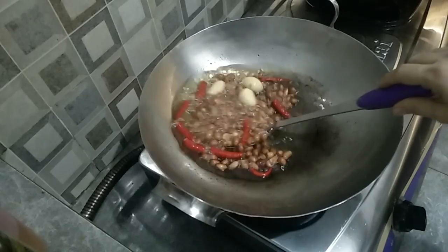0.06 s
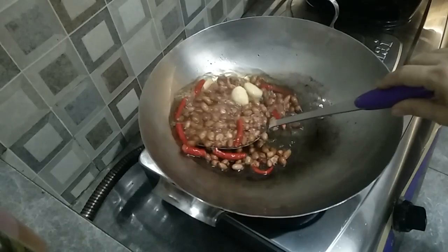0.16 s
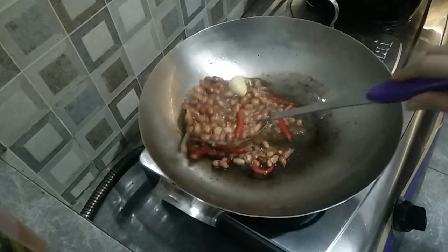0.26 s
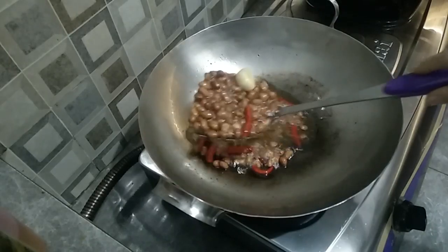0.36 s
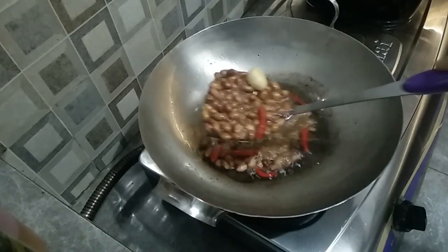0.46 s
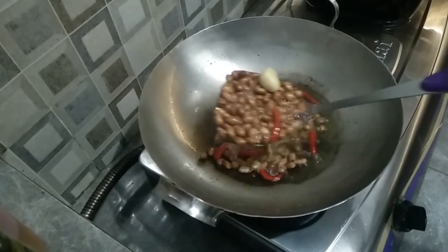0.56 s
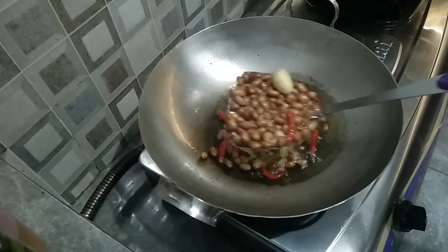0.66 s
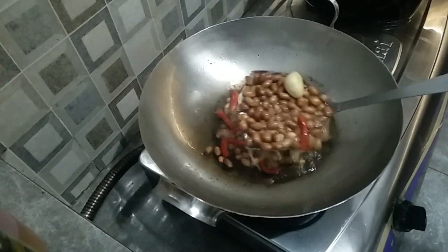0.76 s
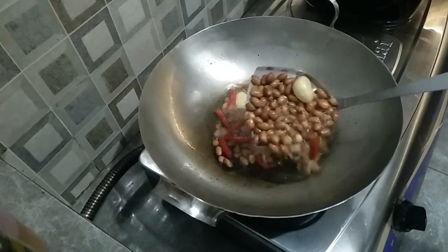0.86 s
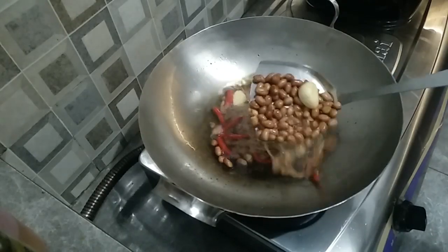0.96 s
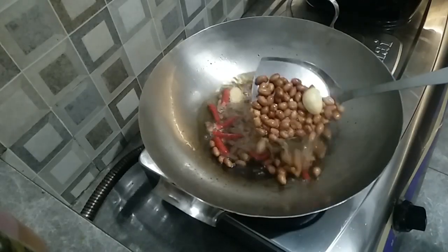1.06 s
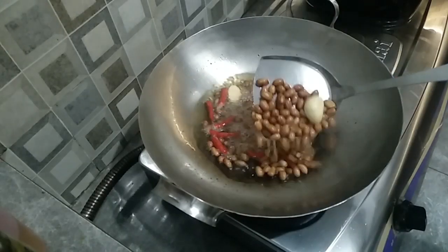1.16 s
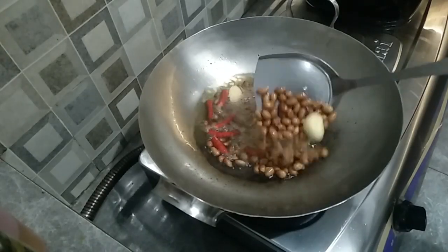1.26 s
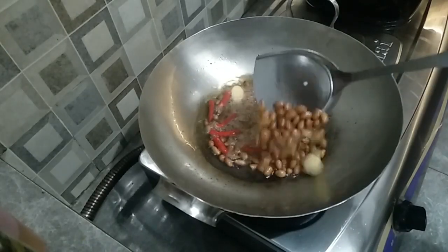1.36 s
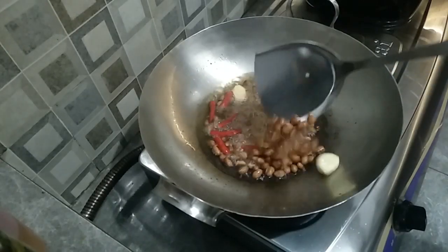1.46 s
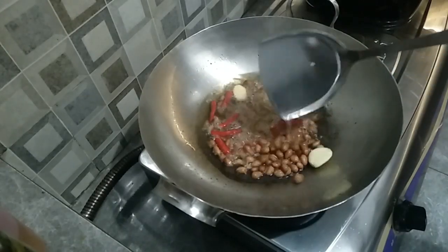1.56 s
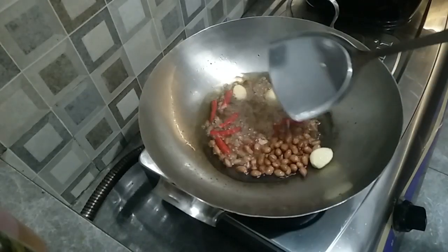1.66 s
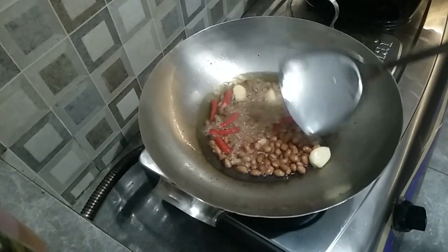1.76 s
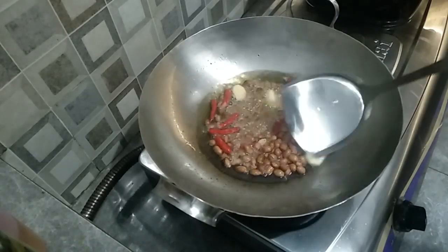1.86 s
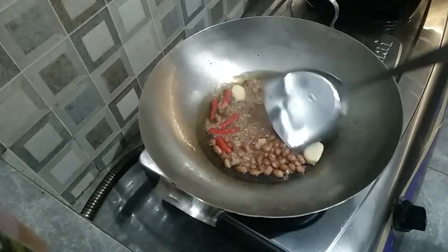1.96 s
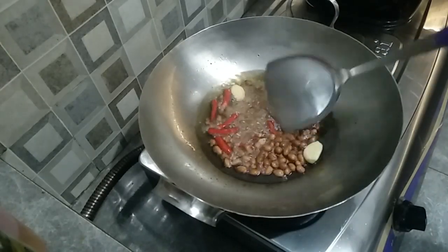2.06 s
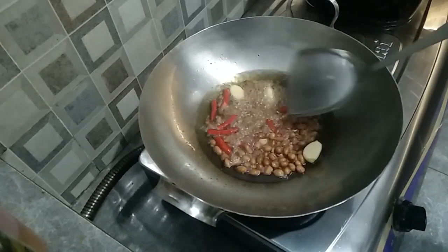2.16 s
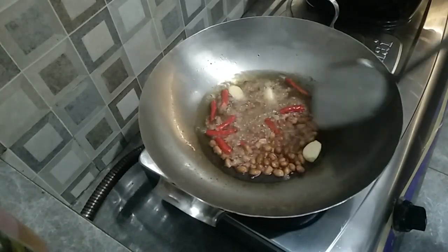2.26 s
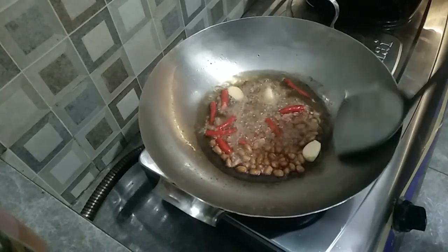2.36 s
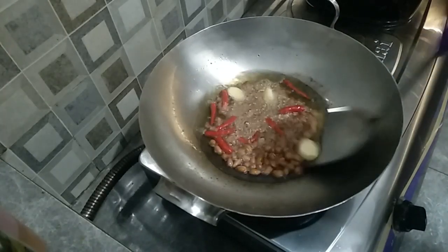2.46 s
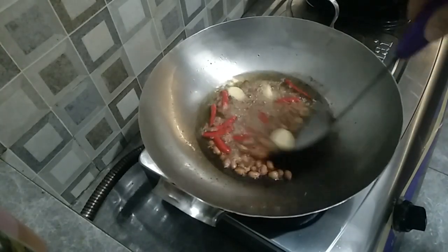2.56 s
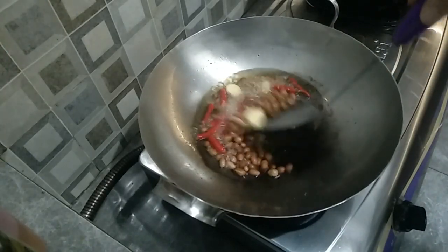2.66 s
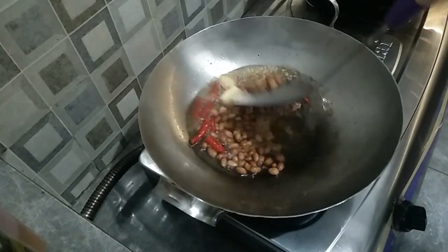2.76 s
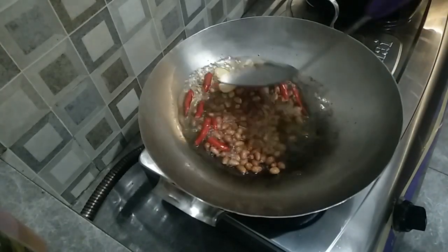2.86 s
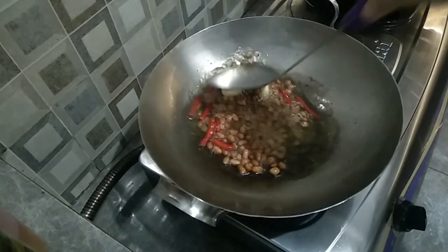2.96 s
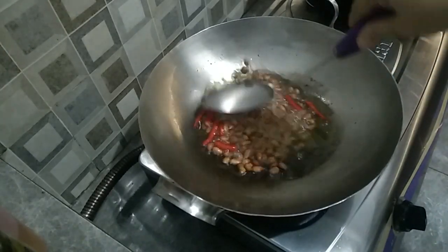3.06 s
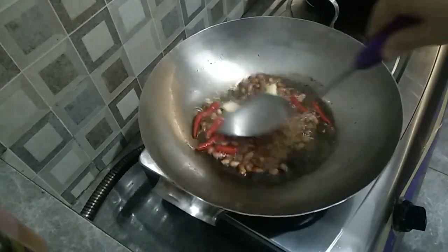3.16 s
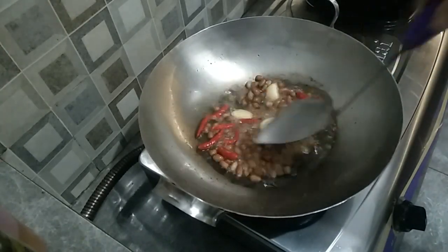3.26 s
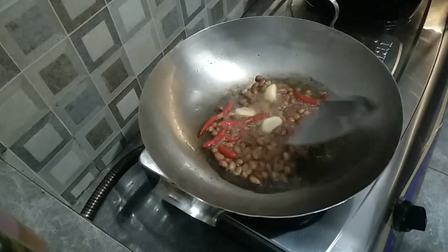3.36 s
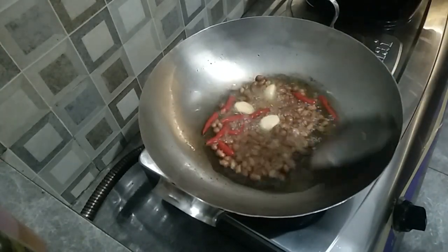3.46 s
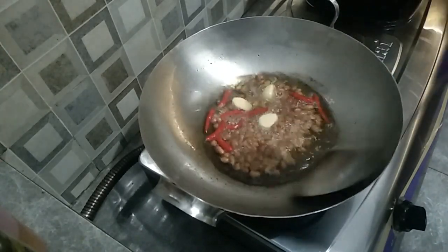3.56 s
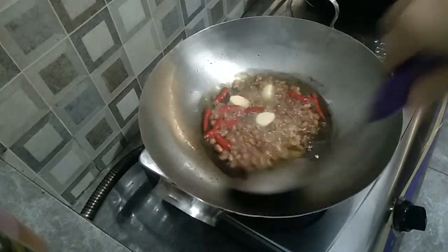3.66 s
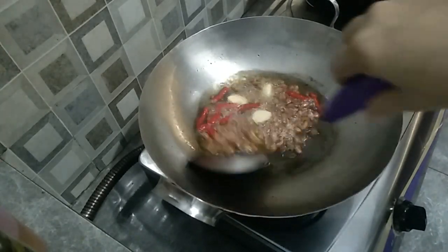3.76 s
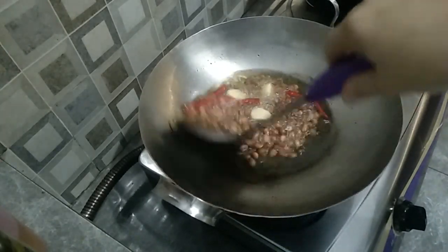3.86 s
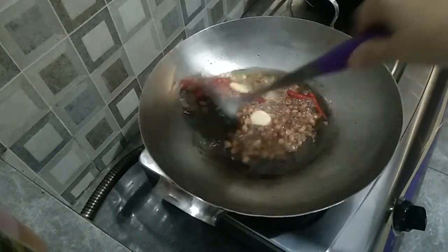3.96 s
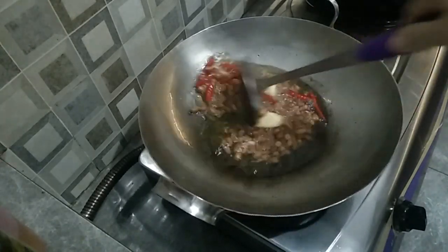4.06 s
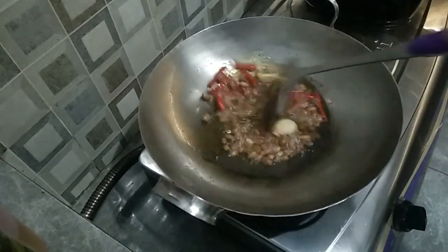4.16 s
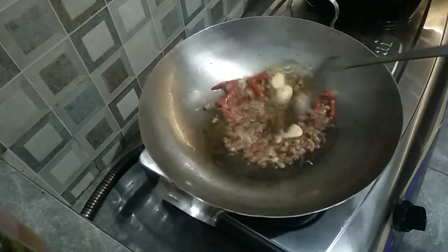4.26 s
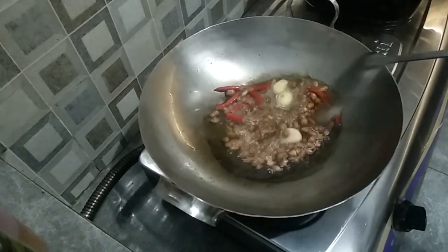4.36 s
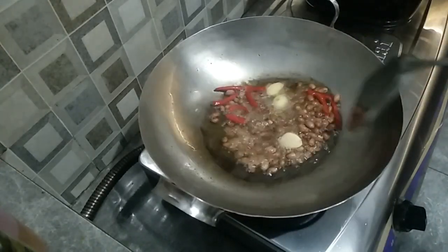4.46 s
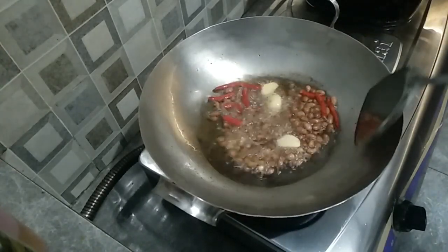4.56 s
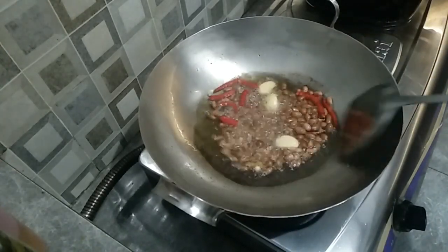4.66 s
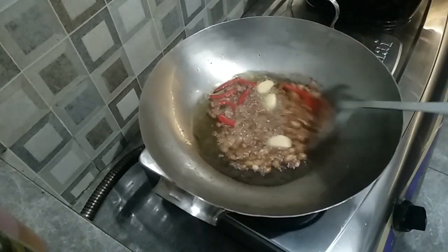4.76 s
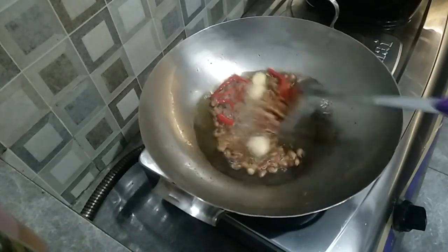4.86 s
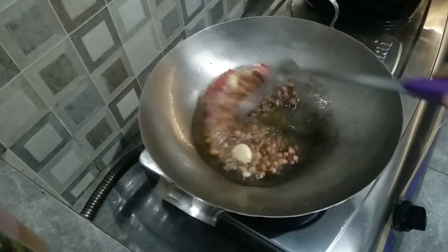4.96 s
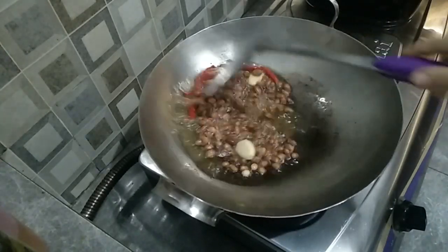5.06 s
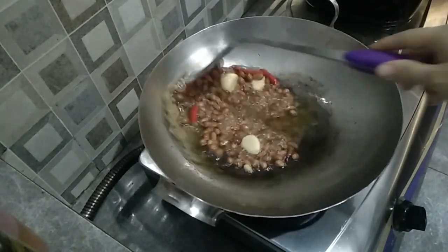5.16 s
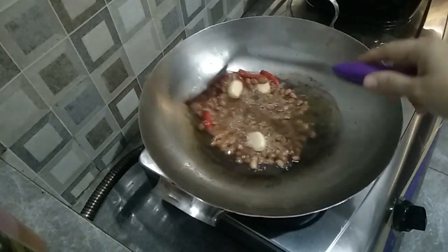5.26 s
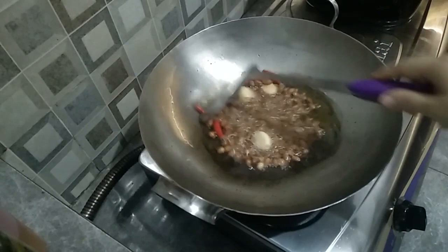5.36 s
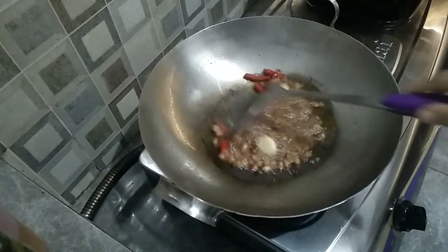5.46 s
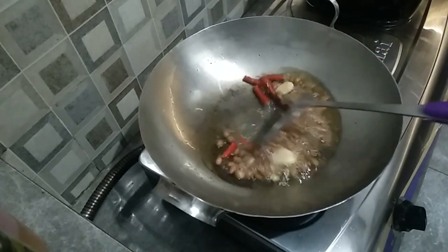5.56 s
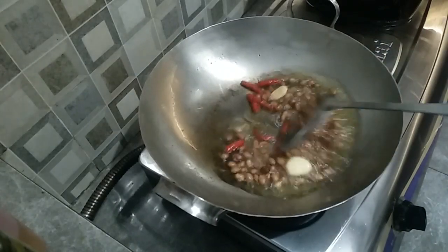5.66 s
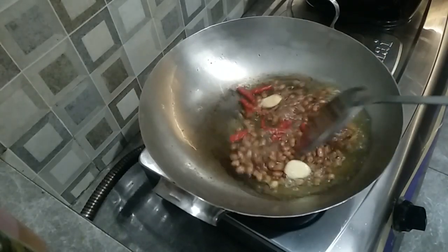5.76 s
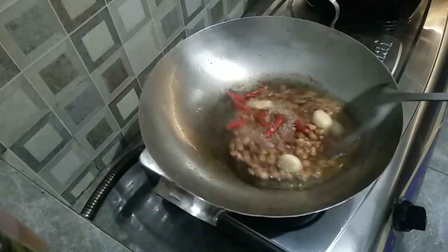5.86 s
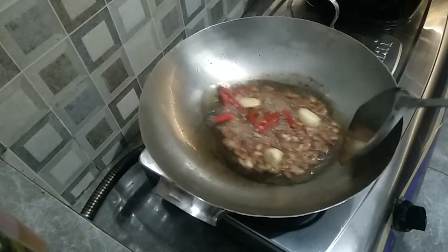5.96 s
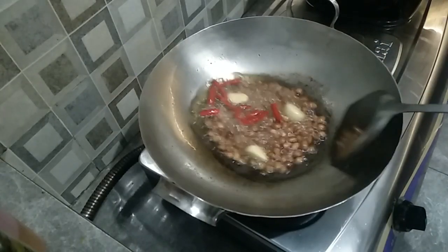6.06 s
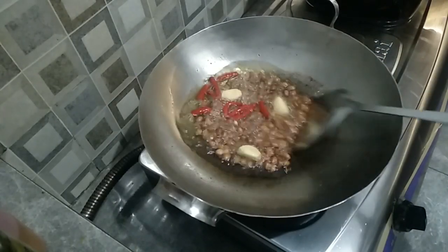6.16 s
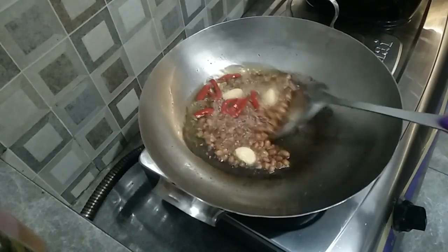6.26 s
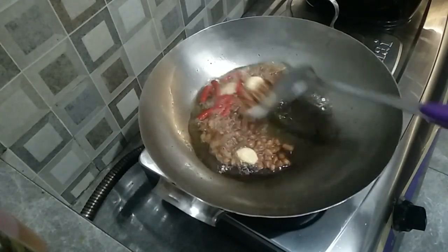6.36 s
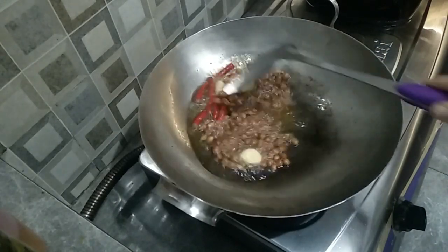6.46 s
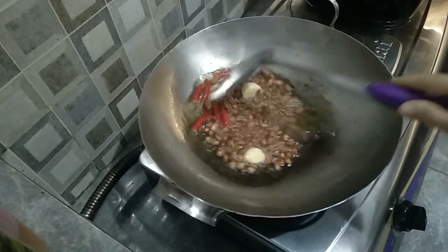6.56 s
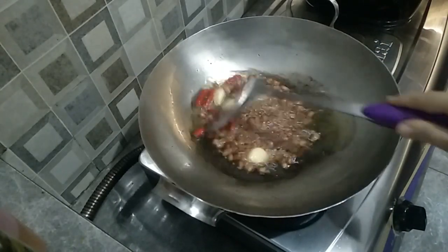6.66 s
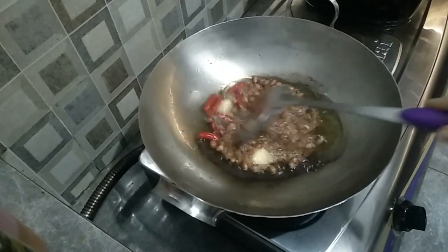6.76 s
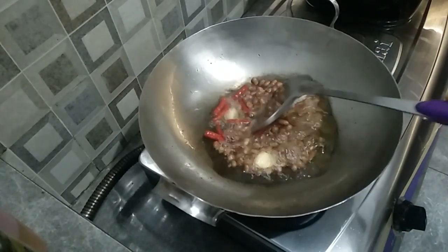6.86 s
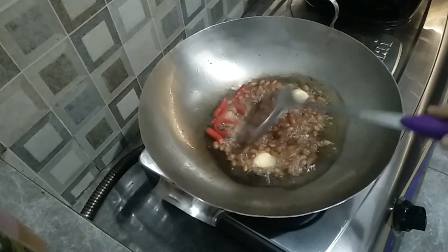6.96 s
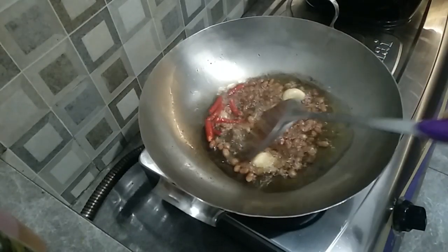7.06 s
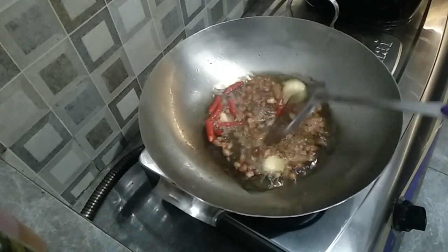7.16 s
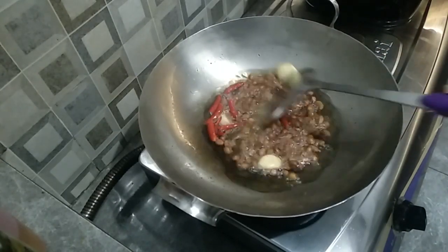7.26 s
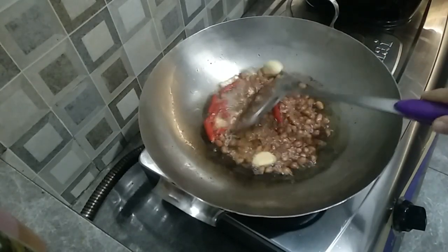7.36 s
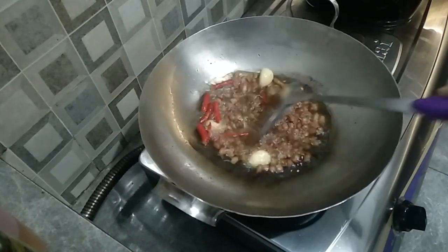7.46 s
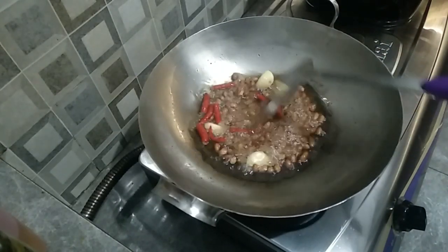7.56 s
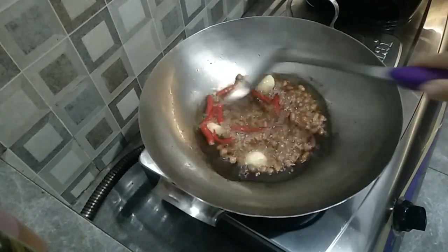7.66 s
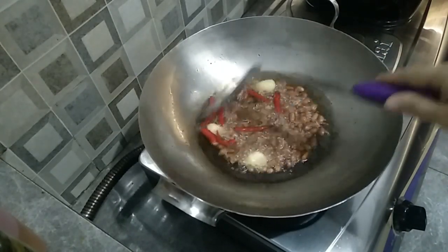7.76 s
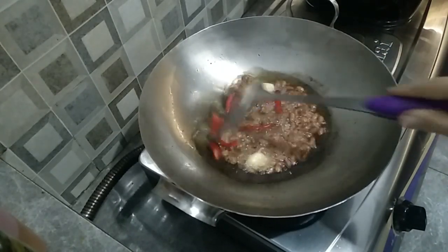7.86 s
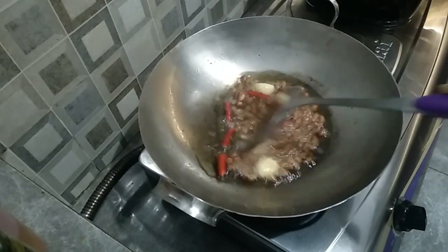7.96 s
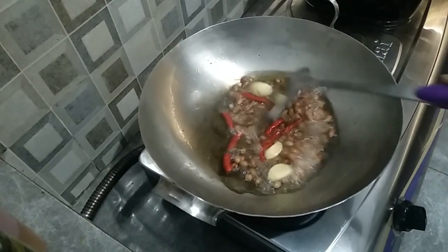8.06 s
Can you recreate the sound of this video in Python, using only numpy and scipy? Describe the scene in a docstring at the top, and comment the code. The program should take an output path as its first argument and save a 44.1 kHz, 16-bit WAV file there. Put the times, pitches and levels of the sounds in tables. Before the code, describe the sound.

Hot oil fizzes and crackles in a steel wok, with nuts ticking and a metal spatula scraping and clinking.

```python
"""Hot oil fizzes and crackles as steam bubbles burst around peanuts in a steel wok.
The stirred nuts scrape, tick and drum on the bowl, ringing its modes. A steel spatula lands on the wall,
chatters with a bright hiss and a clang, and scrapes on through the food; the wok thuds on its stand.
Underneath, a gas burner hisses on the right and a small tiled kitchen adds a short reverb."""
import sys
import numpy as np
from scipy import signal
from scipy.fft import rfft, irfft, next_fast_len
from scipy.io import wavfile
from scipy.ndimage import uniform_filter1d, map_coordinates

SR = 44100
rng = np.random.default_rng(int(sys.argv[2]) if len(sys.argv) > 2 else 0)


def unload_audio(sound):
    """Save the sound as a 16-bit wav file, at the path given as the first command line argument."""
    columns = np.transpose(np.atleast_2d(sound))
    # keep every value between -1 and 1, then stretch to whole-number steps
    steps = np.round(np.clip(columns, -1, 1) * 32767)
    wavfile.write(sys.argv[1], SR, steps.astype(np.int16))


N = 357651

# Cue levels are faders ahead of each layer's trim and EQ. Pan is left minus right.
# Fader ride of the sizzle: (time [s], level [dB])
SIZZLE_RIDE = [(0, -46), (.35, -51.5), (.7, -46.5), (1.4, -50), (1.9, -50.5), (2.35, -52), (2.8, -46),
               (3.1, -49), (3.55, -50), (4.0, -50), (4.4, -49), (5.0, -54.5), (5.6, -52.5), (6.3, -52.5),
               (6.7, -46.5), (7.1, -51.5), (7.6, -46), (8.11, -54.5)]
# Flurries of bubbles as the heap is turned: (centre time [s], level [dB], length [s])
FLURRIES = [(0.105, -45.5, 0.28), (0.865, -46, 0.034), (0.912, -45, .1), (1.04, -44, 0.061),
            (0.942, -40.5, .04), (1.19, -41, 0.048), (1.248, -42.5, .04), (1.347, -47, 0.061),
            (1.56, -50, 0.046), (1.763, -49, 0.058), (2.13, -47.5, 0.12), (2.667, -43, 0.015),
            (2.886, -44.5, 0.12), (2.943, -38.5, 0.026), (3.34, -47.5, 0.26), (4.253, -45, 0.29),
            (4.325, -46.5, 0.11), (5.224, -44.5, 0.23), (5.487, -46.5, 0.14), (5.71, -43.5, 0.064),
            (5.791, -42, 0.056), (5.9, -43, 0.11), (6.613, -45.5, 0.21), (6.715, -44, 0.054),
            (7.0, -44, 0.065), (7.085, -47, 0.094), (7.355, -42.5, 0.13), (7.45, -42.5, 0.03),
            (7.634, -41, 0.028), (8.096, -45, 0.048)]
# Tone of the bubbles and gas jets: (frequency [Hz], level [dB])
FIZZ_EQ = [(2060, -38), (3500, -20.5), (4230, -2.5), (4480, -19), (5140, -3), (8620, 1), (12600, -0.5),
           (15100, -7.5), (15800, -3)]
# Spatula landings: (time [s], hiss [dB], knock [dB], knock pitch [Hz], roll-off below [dB/octave],
# roll-off above [dB/octave], ring at 4 kHz [dB], mode width [factor], chatter [s],
# treble tilt [dB/octave], pan [dB], attack [s], decay t60 [s])
LANDINGS = [(2.4048, -17.5, -12, 1610, 16.6, 4.2, -19, 0.76, 0.03, -2, 0.5, 0.013, 0.057),
            (2.446, -41, -16, 1300, 7.4, 19, -17.5, 0.74, 0.011, -18, -0.15, 0.015, 0.038),
            (3.604, -24, -20.5, 1360, 9, 4.2, -20, 1.8, 0.023, -6.5, 1, 0.016, 0.062),
            (4.539, -19, -24, 1290, 11, 5.8, -19, 0.79, 0.018, 5, 1, 0.0092, 0.12),
            (4.676, -17, -20.5, 2130, 13, 26, -21.5, 0.52, 0.025, 2.5, 0.21, 0.0082, 0.069),
            (4.704, -24.5, -31, 1880, 13, 16, -17, 0.41, 0.012, -6, -0.64, 0.0097, 0.056),
            (5.331, -30, -10, 1100, 6.1, 13.5, -25.5, 1.24, 0.021, -16, -2, 0.012, 0.071),
            (5.354, -52, -28, 940, 6.1, 20, -36, 1.6, 0.01, -14, -1.2, 0.01, 0.046),
            (5.381, -54, -31, 850, 9.6, 26, -34, 1.3, 0.025, -14, -0.95, 0.0096, 0.058),
            (5.446, -48, -21, 650, 4.6, 14.6, -42, 1.8, 0.015, -17, -1.4, .009, 0.029),
            (6.0437, -20.5, -22, 1670, 7.5, 8.9, -23, 0.58, 0.039, -1, -0.8, .016, 0.093),
            (6.1094, -46, -21.5, 610, 8, 23, -18.5, 0.5, 0.0068, -12, 0.27, 0.023, 0.056)]
# Tone of steel rubbing on steel: (frequency [Hz], level [dB])
STEEL_EQ = [(2650, -22), (4500, -6), (5190, -22), (5440, 4.5), (6400, 7.5), (6850, 10.5), (8730, -2.5),
            (9490, 14), (10300, -4), (11200, 2.5), (13900, 7), (15100, 11), (15800, -24)]
# Resonances of the spatula blade: (frequency [Hz], base width [Hz], level [dB])
BLADE_MODES = [(5230, 100, 1), (5760, 60, -29), (6670, 50, 8), (6880, 260, 15), (7300, 39, 7),
               (9120, 82, 6), (8700, 30, 14), (10240, 69, 9), (10500, 170, 10.5), (11920, 45, 17.5),
               (12400, 68, -23), (14100, 86, -5), (14200, 140, -13), (15000, 100, -5)]
# Resonances of the bowl: (frequency [Hz], base width [Hz], level [dB])
BOWL_MODES = [(171.6, 12.3, -3.5), (287, 126, -4), (376.7, 25.2, 7), (425, 61, 0), (504.4, 45, 6),
              (601, 26, -1), (671.6, 68, -2), (763, 100, -3.5), (847, 65, -3), (976, 23, -5.5),
              (1053, 17, -5), (1175, 90, 0), (1358, 50, -1.5), (1489, 56, -0.5), (1694, 112, -4.5),
              (2027, 150, -3), (2218, 15, -1), (2408, 80, -3.5), (2857, 62, -3.5), (3055, 14, -2),
              (3443, 19, 3), (3730, 13, -4), (3953, 20, -2), (4443, 101, 1.5), (4884, 37, -5)]
# Short tones of the bowl ringing on after hits and bumps: (time [s], pitch [Hz], level [dB], hold [s])
BOWL_RINGS = [(.01, 1184, -50, 0.069), (0.905, 2960, -58, 0.056), (1.046, 4000, -51.5, 0.038),
              (1.05, 2940, -58, .04), (1.142, 2930, -58, 0.026), (1.21, 2970, -65, 0.047),
              (2.402, 1723, -40, 0.018), (2.443, 3720, -38.5, 0.028), (2.45, 517, -48.5, .11),
              (2.497, 1320, -50, 0.14), (2.514, 3403, -39.5, .025), (2.64, 385.6, -47.5, 0.063),
              (2.94, 380.6, -52.5, 0.069), (3.608, 2970, -43.5, 0.018), (4.552, 3820, -46.5, 0.064),
              (4.6, 492, -54, 0.04), (4.676, 4550, -40, .015), (4.676, 5600, -43, 0.017),
              (6.81, 490, -59, 0.029), (6.885, 507, -56.5, .03), (6.95, 372, -54, .15),
              (7.0, 496, -54, 0.066), (8.08, 1880, -52, 0.028)]
# Fader rides of the stirring: (time [s], scrape [dB], tumble [dB])
STIR_RIDE = [(0.0, -52.5, -53), (0.5, -58, -60), (1.22, -54.5, -58.5), (1.89, -57.5, -58.5),
             (2.37, -58.5, -56), (2.47, -73, -50), (2.62, -52, -52), (2.78, -51.5, -53), (3.06, -57, -58.5),
             (3.3, -52.5, -52.5), (3.55, -59, -58.5), (3.68, -53, -55), (4.09, -58.5, -59),
             (4.29, -51.5, -54.5), (4.58, -58, -57), (4.72, -45, -56), (4.83, -49.5, -56),
             (5.17, -56.5, -55), (5.44, -53, -59), (5.89, -56.5, -60.5), (6.2, -57.5, -58),
             (6.84, -54, -56), (7.2, -55.5, -58), (7.45, -55, -55.5), (7.86, -59.5, -58.5),
             (8.11, -50.5, -55.5)]
# Crossover between the bowl's low and high modes: (frequency [Hz], drive [dB])
LOW_MODES, HIGH_MODES = [(750, 0), (800, -60)], [(750, -60), (800, 0)]
# Nuts that drop or spit: (time [s], level [dB], pitch [Hz], t60 [s], pan [dB])
TICKS = [(0.0994, -36, 6040, 0.099, 4), (0.1954, -32, 10500, 0.14, -6.5), (0.9094, -36, 8420, 0.29, 6),
         (0.91, -41, 3770, 0.98, 2), (1.05, -31, 4150, 0.18, 0), (1.144, -28.5, 6330, 0.3, 0),
         (1.2094, -31, 8400, 0.32, -6), (1.2, -37, 4070, 0.22, 0), (1.225, -39, 4250, 0.11, -2),
         (1.3394, -47, 6810, 0.072, -12), (1.35, -38.5, 2570, 0.51, 1), (1.4794, -31, 6240, 0.31, -3),
         (1.5685, -35, 7150, 0.065, -9), (1.697, -29.5, 10500, 0.049, -18), (1.907, -30, 4960, 0.18, 1),
         (2.6694, -42, 8950, 0.041, -7.5), (2.934, -31, 7600, 0.48, 4), (4.234, -29, 8500, .05, -3),
         (4.299, -26, 6840, 0.068, 1), (4.4104, -32, 9510, 0.05, -12), (7.456, -26, 4730, 0.22, 0),
         (7.8002, -29.5, 10600, 0.12, -5.5)]
# Dull bumps of the heap on the bowl: (time [s], level [dB], pitch [Hz])
BUMPS = [(0.097, -39.5, 511), (0.194, -43, 440), (1.549, -48.5, 370), (2.433, -36.5, 574),
         (2.853, -39.5, 396), (2.954, -40.5, 393), (3.224, -36, 360), (3.289, -40, 507), (3.35, -42.5, 388),
         (3.755, -40.5, 410), (4.294, -40, 452), (5.486, -33.5, 552), (5.564, -41, 380), (5.73, -42, 307),
         (6.423, -43, 370), (6.695, -48, 371), (6.928, -43, 462), (6.982, -39.5, 389.5), (7.434, -45, 290),
         (7.529, -41, 504), (7.7, -49, 377)]
# The wok rocking on its stand: (time [s], level [dB])
THUDS = [(2.402, -63), (2.579, -60.5), (2.752, -59), (3.226, -52), (3.6, -60), (4.29, -58), (4.535, -60),
         (4.67, -58), (4.867, -55.5), (5.329, -47), (5.485, -54)]
# Tone of the gas flame and the room: (frequency [Hz], level [dB])
ROOM_TONE_EQ = [(24, -67), (40, -3), (490, -11.5), (2420, -34), (2620, -2.5), (5000, -15.5), (6500, -63),
                (11000, -120)]
# Narrow wandering dips in the spectrum: (frequency [Hz], width [Hz], depth [0-1], drift [Hz])
DIPS = [(843, 89, 0.52, 47), (2120, 136, 0.69, 75), (2698, 85, 0.98, 53), (3438, 162, 1, 83),
        (4283, 260, 0.6, 180), (5270, 157, 1, 99)]
# Decay of the tiled kitchen: (frequency [Hz], t60 [s])
KITCHEN_DECAY = [(200, 0.16), (2000, 0.067), (10000, 0.22)]
# Stereo image of the food and background: (frequency [Hz], left-right correlation [0-1])
FOOD_IMAGE = [(60, 0.23), (130, 0.88), (290, 0.99), (640, 0.92), (1410, 0.73), (3100, 1), (6820, 0.54),
              (15000, 0.18)]
# Stereo image of the ringing steel: (frequency [Hz], left-right correlation [0-1])
STEEL_IMAGE = [(60, 0.89), (130, 0.68), (290, 0.96), (640, 0.99), (1410, 1), (3100, 1), (6820, 0.49),
               (15000, 0.24)]
# Rightward lean of the stirring and room tone: (frequency [Hz], pan [dB])
STIR_PAN = [(130, -3), (400, -5.5), (1200, -6), (3500, -2)]

SHOT = SR // 2  # length of a one-shot [samples]


def oil():
    """Steam bubbles burst in the oil: a fine fizz with a random narrow-band shimmer, and larger pops."""
    colour = lambda hz: amp(along(FIZZ_EQ, hz))
    shimmer = patchy(gritty(700, spiky_db=1.5), depth_db=5, size=(3, 2))
    fizz = stereo(patchy(shimmer, depth_db=3, size=(16, 2)), colour)
    pops = amp(-10.5) * unit(stereo(crackle(), colour))
    return sizzle_level() * panned(-2) * (unit(fizz) + pops)


def crackle(per_second=110, spread_db=4, decay_s=0.0068):
    """Larger bubbles burst one by one, each a brief spit of noise."""
    when, size = rng.random((2, int(per_second * N / SR)))
    pops = np.bincount((when * N).astype(int), amp(-spread_db * np.log(1.005 - size)), N)
    spit = np.exp(-np.arange(SR // 50) / (decay_s * SR))
    return signal.fftconvolve(pops, spit)[:N] * rng.standard_normal((2, N))


def sizzle_level(flare_db=-15, flare_t60=0.65):
    """Gain of the oil: a flickering bed, flurries of bubbles and a flare after each spatula landing."""
    t = np.arange(0, N / SR, .001)
    flurries = sum(amp(db) ** 2 * np.cos(np.pi * np.clip((t - s) / length, -.5, .5)) ** 2
                   for s, db, length in FLURRIES)
    flares = sum((t > s) * amp(hiss_db + flare_db - 60 * np.abs(t - s) / flare_t60) ** 2
                 for s, hiss_db, *_ in LANDINGS)
    bed_db, = rides(SIZZLE_RIDE)
    bed = amp(bed_db + 0.71 * wobble(18))
    return np.sqrt(bed ** 2 + np.interp(np.arange(N) / SR, t, flurries + flares))


def spatula(edge):
    """The blade lands, chatters and slides: its edge hisses, and the bowl clangs and rings on."""
    out = np.zeros((2, N))
    for (s, hiss_db, knock_db, knock_hz, below, above, ring_db, damping,
         chatter, tilt, pan, attack, t60) in LANDINGS:
        force = envelope(attack, chatter, t60, tail_t60=0.89, tail_db=-13)
        grit = piece(edge, s)
        hiss = amp(hiss_db) * struck(force, grit, blade(tilt))
        clang = struck(force, grit, struck_bowl(knock_db, knock_hz, below, above, ring_db, damping))
        add(out, s - .011, panned(pan) * (hiss + clang))
    return out


def blade(tilt):
    """Response of the blade: steel hiss plus modes that shift with the grip and the spot on the edge."""
    ring = modes([(hz * (1 + rng.normal(0, 0.02)), width * 2, db + rng.normal(0, 1.5))
                  for hz, width, db in BLADE_MODES])
    treble = lambda hz: amp(tilt * np.log2(np.maximum(hz, 4000) / 9000))
    return lambda hz: (amp(along(STEEL_EQ, hz) - 11.5) + amp(-10) * ring(hz)) * treble(hz)


def struck_bowl(knock_db, knock_hz, below, above, ring_db, damping):
    """Response of the bowl's wall: a pitched knock and a bright ring, a little different at each spot."""
    pitches = np.transpose(BOWL_MODES)[0]
    octaves = np.log2(pitches / knock_hz)
    knock = knock_db - np.where(octaves < 0, -below * octaves, above * octaves)
    ring = ring_db + 11 * np.log2(pitches / 4000)  # rises 11 dB an octave
    drives = 10 * np.log10(amp(knock) ** 2 + amp(ring) ** 2)
    return modes([(hz * (1 + rng.normal(0, 0.0093)), width * damping, db + drive + rng.normal(0, 1.5))
                  for (hz, width, db), drive in zip(BOWL_MODES, drives)], q=80)


def bowl_rings(grit, sharpness=37, waver_hz=25):
    """The bowl rings on briefly after hits and bumps: half wavering tone, half narrow noise."""
    out, waver = np.zeros((2, N)), wobble(40)[None]
    for s, hz, db, hold in BOWL_RINGS:
        resonance = modes([(hz, hz / sharpness, 0), (hz * 1.1, hz / sharpness, -6)], q=90)
        rasp = unit(stereo(piece(grit, s), resonance, STEEL_IMAGE))
        pitch = hz + waver_hz * piece(waver, s)
        tone = np.sqrt(2) * np.sin(2 * np.pi * np.cumsum(pitch, axis=1) / SR)
        shape = envelope(0.018, hold, t60=0.21, tail_t60=0.2, tail_db=-42)
        add(out, s - .01, amp(db) * panned(-0.43) * burst(shape, tone + rasp))
    return out


def stirring():
    """Nuts scrape the steel in its high modes while the tumbling heap drums the low ones."""
    scrape_db, tumble_db = rides(STIR_RIDE)
    scrape = stereo(patchy(gritty(300, spiky_db=-1.5), depth_db=5, size=(2, 4)), bowl(HIGH_MODES))
    tumble = stereo(patchy(gritty(30, spiky_db=2), depth_db=1.5, size=(2, 3)), bowl(LOW_MODES))
    return amp(scrape_db) * unit(scrape) + amp(tumble_db) * unit(tumble)


def nut_ticks(ring_gain=1.6, trim_db=-22):
    """Single nuts drop or spit: short bright rattles that ring the bowl's high modes."""
    out, grit = np.zeros((2, N)), gritty(400, spiky_db=4)
    ring = bowl(HIGH_MODES)
    for s, db, hz, t60, pan in TICKS:
        band = lambda f: (1 + ring_gain * ring(f)) / (1 + (2.1 * np.log((f + 1) / hz)) ** 4)
        rattle = stereo(piece(grit, s), band)
        contact = envelope(0.009, 0.01, t60, tail_t60=t60, tail_db=3.5)
        add(out, s - .008, amp(db + trim_db) * panned(pan) * burst(contact, rattle))
    return out


def heap_bumps(t60=0.24, trim_db=-13):
    """The heap bumps the bowl softly and wakes only the low modes near one pitch."""
    out = np.zeros((2, N))
    contact = envelope(0.012, 0.017, t60, tail_t60=t60, tail_db=-1.5)
    for s, db, hz in BUMPS:
        drive = [(hz / 1.9, -60), (hz / 1.34, -30), (hz / 0.91, 0),
                 (hz * 0.995, 0), (hz * 1.13, -30), (hz * 2.6, -60)]
        bump = stereo(rng.standard_normal((2, SHOT)), bowl(drive))
        add(out, s - .012, amp(db + trim_db) * burst(contact, bump))
    return out


def wok_thuds(low_hz=122, high_hz=360, t60=0.15):
    """The whole wok rocks on its stand with a dull, low push."""
    out = np.zeros((2, N))
    band = lambda hz: 1 / (1 + (hz / high_hz) ** 4) / (1 + (low_hz / (hz + 1)) ** 3)
    contact = envelope(0.012, 0.02, t60, tail_t60=t60, tail_db=-12)
    for s, db in THUDS:
        push = stereo(rng.standard_normal((2, SHOT)), band)
        add(out, s, amp(db) * burst(contact, push))
    return out


def burner(level_db=-47, pan_db=-33):
    """The gas jets hiss far to the right with a slight flutter."""
    rush = patchy(rng.standard_normal((2, N)), depth_db=5, size=(3, 2))
    jets = stereo(rush, lambda hz: amp(along(FIZZ_EQ, hz)))
    return amp(level_db + 0.61 * wobble(20)) * unit(panned(pan_db) * jets)


def room_tone(level_db=-65):
    """A faint, steady bed of flame and kitchen air."""
    air = stereo(rng.standard_normal((2, N)), lambda hz: amp(along(ROOM_TONE_EQ, hz)))
    return amp(level_db) * unit(air)


def wandering_dips(x, rate_hz=11, depth_swing=0.26):
    """Narrow dips in the spectrum that wander in pitch and vary in depth at random."""
    hz, t, spectrum = signal.stft(x, SR, nperseg=2048)
    drift = lambda: map_coordinates(rng.standard_normal(int(N * rate_hz / SR) + 4), [t * rate_hz])
    for centre, width, depth, drift_hz in DIPS:
        offset = 2 * (hz[:, None] - centre - drift_hz * drift()) / width
        cut = np.clip(depth + depth_swing * drift(), 0, .97)
        spectrum = spectrum * (1 - cut / (1 + offset ** 4))
    return signal.istft(spectrum, SR, nperseg=2048)[1][:, :N]


def kitchen(x):
    """Reverb off the tiled walls; each frequency dies at its own speed."""
    hz, t, spectrum = signal.stft(rng.standard_normal((2, SR // 2)), SR, nperseg=256)
    decay = amp(-60 * t / along(KITCHEN_DECAY, hz)[:, None])
    tail = signal.istft(spectrum * decay, SR, nperseg=256)[1]
    delayed = np.pad(x, ((0, 0), (300, 0)))  # 7 ms pre-delay
    return signal.fftconvolve(delayed, tail / np.linalg.norm(tail[0]), axes=1)[:, :N]


def bowl(drive):
    """Response of the bowl with its modes driven by (frequency [Hz], drive [dB]) points."""
    return modes([(hz, width, db + along(drive, hz))
                  for hz, width, db in BOWL_MODES if along(drive, hz) > -59])


def modes(table, q=50):
    """Resonator bank of (frequency [Hz], width [Hz], level [dB]) modes, damped to a Q of at most q."""
    pitches, widths, levels = np.transpose(table)
    widths = np.maximum(widths, pitches / q)
    return lambda f: sum((-1) ** k * amp(db) * 1j * f * width / (hz * hz - f * f + 1j * f * width)
                         for k, (hz, width, db) in enumerate(zip(pitches, widths, levels)))


def envelope(attack, hold, t60, tail_t60, tail_db):
    """Shape of a contact: a swell, a hold, then a main decay plus a tail; times in seconds."""
    t = np.arange(SHOT) / SR
    after = np.maximum(t - hold, 0)
    decay = amp(-60 * after / t60) + amp(tail_db - 60 * after / tail_t60)
    return np.clip(t / attack, 0, 1) ** 2 * decay


def struck(force, noise, response):
    """A noisy contact force rings a response; force and response set its energy."""
    sound = stereo(force * noise, response, STEEL_IMAGE)
    power_gain = np.mean(np.abs(response(np.fft.rfftfreq(SHOT, 1 / SR))) ** 2)
    return sound * np.sqrt(2 * power_gain) * np.linalg.norm(force) / np.linalg.norm(sound)


def burst(shape, noise):
    """Noise under an envelope, at the envelope's rms."""
    return unit(shape * noise) * np.sqrt(np.mean(shape ** 2))


def gritty(rate, spiky_db):
    """Two noises whose level jumps rate times a second: many tiny contacts or bubbles."""
    return unit(rng.standard_normal((2, N)) * amp(spiky_db * wobble(rate)))


def patchy(pair, depth_db, size):
    """Shimmer from random gain patches, size = (height [43 Hz bins], length [12 ms steps])."""
    spectrum = signal.stft(pair, nperseg=1024)[2]
    patches = uniform_filter1d(rng.standard_normal(spectrum.shape[1:]), size=size[0], axis=0)
    patches = uniform_filter1d(patches, size=size[1], axis=1)
    return signal.istft(spectrum * amp(depth_db * unit(patches)), nperseg=1024)[1][:, :N]


def stereo(pair, response, image=FOOD_IMAGE):
    """Two unrelated signals are filtered as mid and side; the image sets the width by frequency."""
    angle = lambda hz: np.arccos(np.clip(along(image, hz), -1, 1)) / 2
    mid, side = filtered(pair, lambda hz: response(hz) * [np.cos(angle(hz)), np.sin(angle(hz))])
    return np.array([mid + side, mid - side])


def filtered(x, response):
    """x through a complex frequency response."""
    n = x.shape[-1]
    padded = next_fast_len(n + SR // 8)
    return irfft(rfft(x, padded) * response(np.fft.rfftfreq(padded, 1 / SR)), padded)[..., :n]


def wobble(rate):
    """A smooth random curve with rate knots a second."""
    return map_coordinates(rng.standard_normal(int(N * rate / SR) + 4), [np.arange(N) * rate / SR])


def rides(rows):
    """A per-sample fader curve for each column after the time."""
    times, *columns = np.transpose(rows)
    return [np.interp(np.arange(N) / SR, times, column) for column in columns]


def along(points, hz):
    """Read (frequency [Hz], value) points on a log frequency axis."""
    frequencies, values = np.transpose(points)
    return np.interp(np.log(hz + 1), np.log(frequencies + 1), values)


def piece(noise, s):
    """A one-shot's length of noise, starting at s seconds."""
    return np.take(noise, round(s * SR) + np.arange(SHOT), axis=1, mode="wrap")


def add(out, s, sound):
    """Lay a one-shot into out at s seconds."""
    span = out[:, max(round(s * SR), 0):][:, :SHOT]
    span += sound[:, :span.shape[1]]


def panned(db):
    """Left and right gains; positive dB leans left."""
    return amp([[db / 2], [-db / 2]])


def amp(db):
    """Gain of a dB value."""
    return 10 ** (np.asarray(db) / 20)


def unit(x):
    """x at rms 1."""
    return x / np.sqrt(np.mean(x ** 2) + 1e-20)


def scene():
    """A frying bed leaning right, nearly dry hits on top, and wandering dips over the whole mix."""
    lean = lambda hz: amp(np.outer([.5, -.5], along(STIR_PAN, hz)))
    bed = oil() + burner() + filtered(stirring() + room_tone(), lean)
    grit = gritty(400, spiky_db=-1)  # tiny contacts on the steel
    hits = spatula(grit) + bowl_rings(grit) + nut_ticks() + heap_bumps() + wok_thuds()
    reverb = kitchen(amp(-6.5) * bed + amp(-29) * hits)
    return wandering_dips(bed + hits + reverb)


def record(dry, low_cut_hz=140, top_hz=15800):
    """Master EQ: roll off the deep bass and cut the very top."""
    low_cut = signal.butter(3, low_cut_hz, "high", fs=SR, output="sos")
    return filtered(signal.sosfilt(low_cut, dry), lambda hz: hz < top_hz)


dry = scene()
out = record(dry)
unload_audio(out)
```